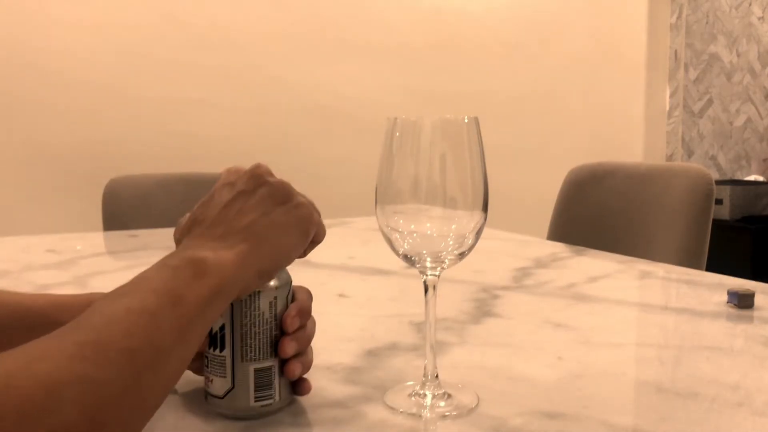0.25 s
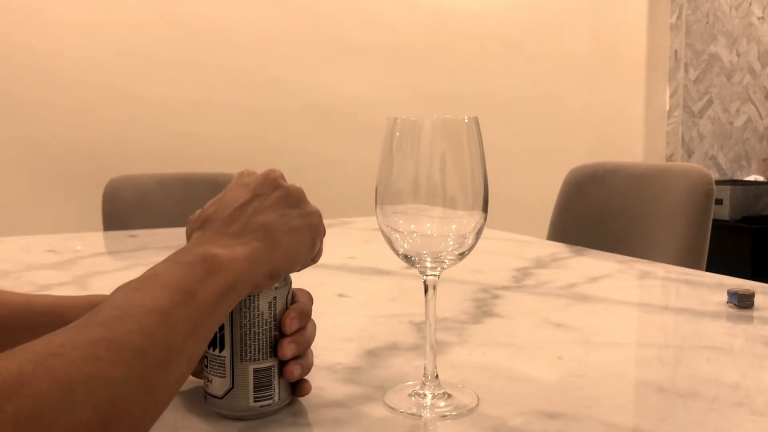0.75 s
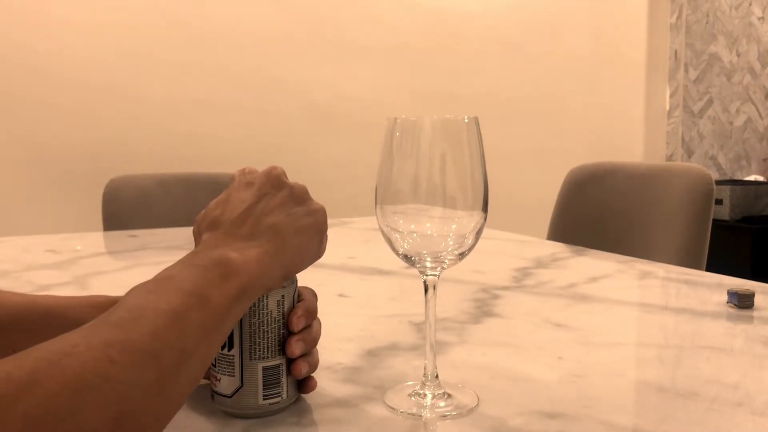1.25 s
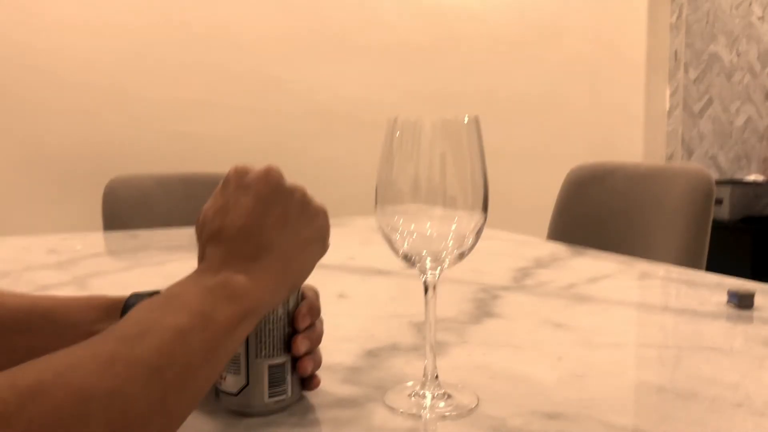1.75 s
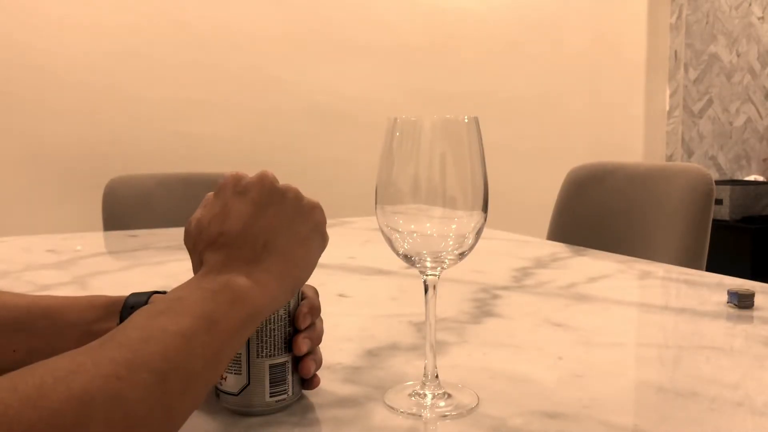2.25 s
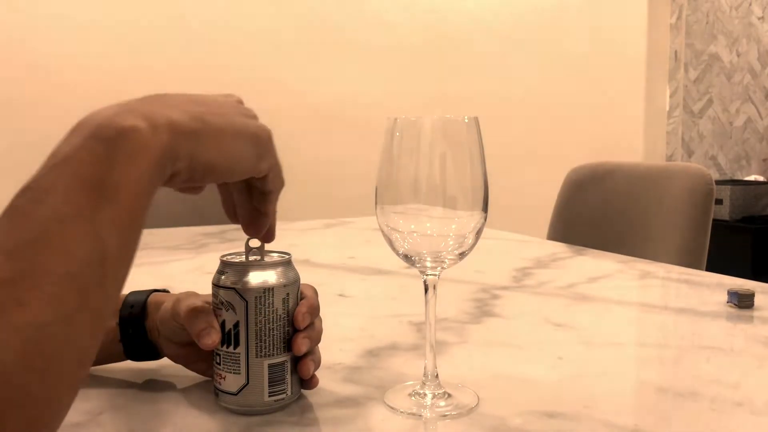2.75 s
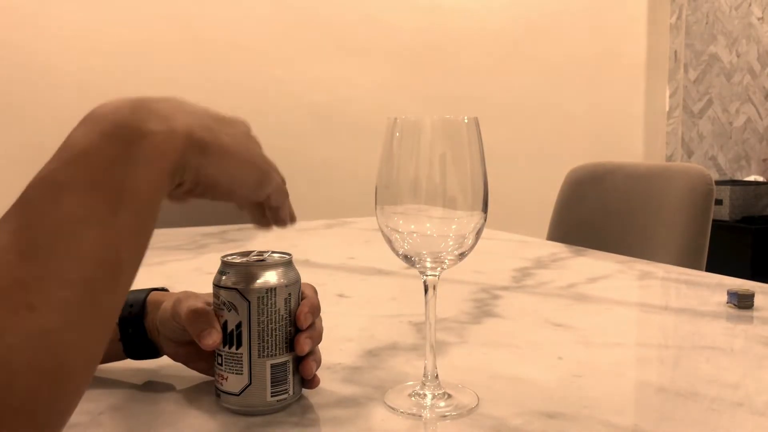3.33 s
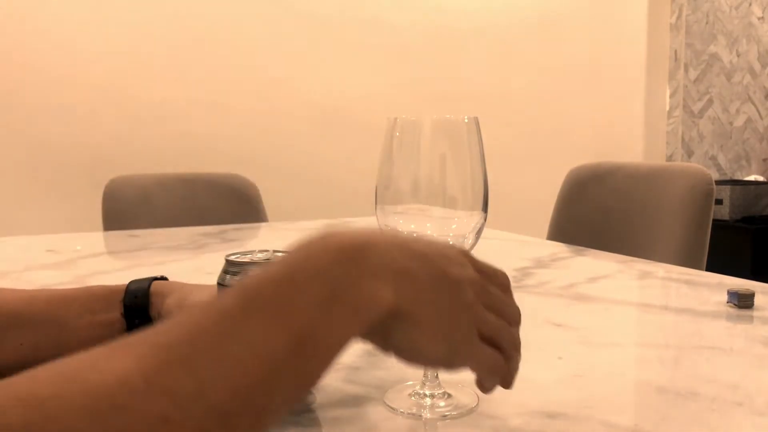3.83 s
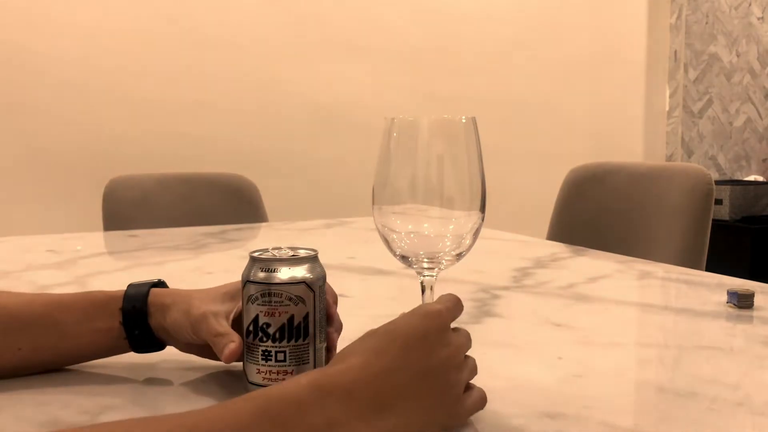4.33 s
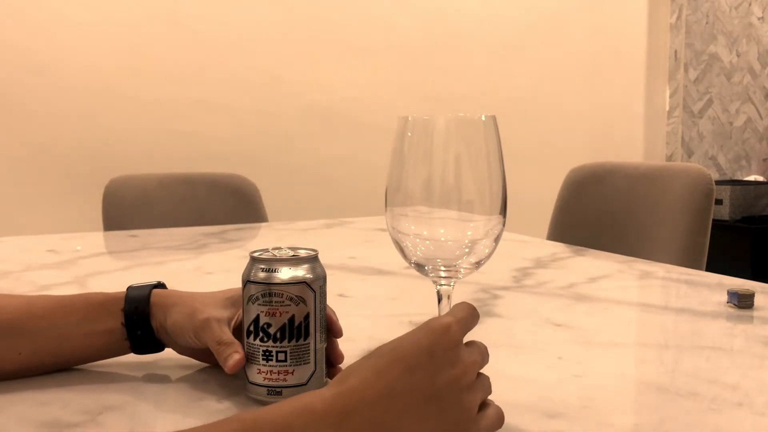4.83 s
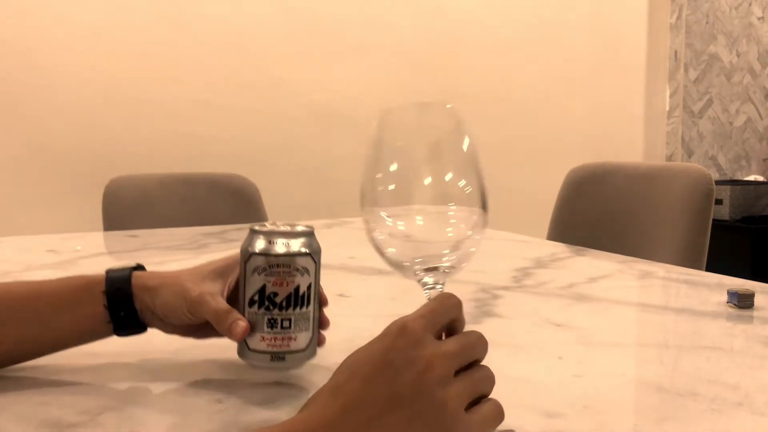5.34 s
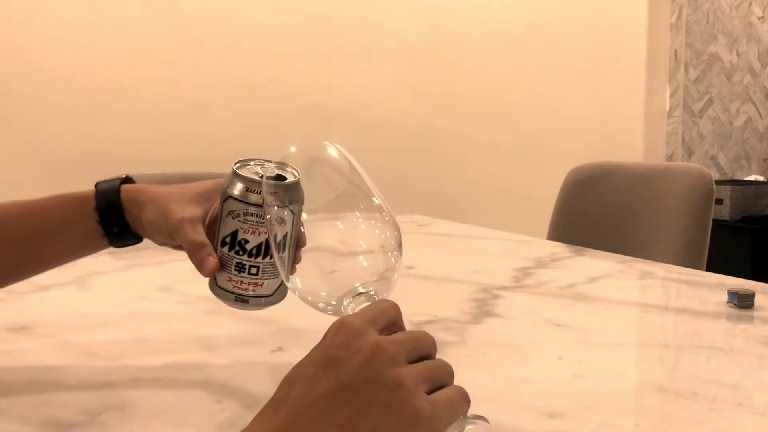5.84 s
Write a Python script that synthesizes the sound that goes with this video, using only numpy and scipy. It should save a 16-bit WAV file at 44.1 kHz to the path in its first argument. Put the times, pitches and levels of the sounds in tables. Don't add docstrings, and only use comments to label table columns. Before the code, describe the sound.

A quiet ventilation hum with a faint low motor tone runs throughout a bare, echoing room. At 0.7 s a ring-pull snaps sharply, and a smooth bright gas hiss swells and fades within about 0.2 s. A louder, thin metallic snap comes at 0.9 s and another at 1.2 s with a weaker spurt and tiny crackles until 1.4 s. At 1.5 s the lid creaks rapidly and tears with a strong crack, followed by hollow little pops and a reverberant tail. Very faint finger ticks and a short drag occur around 2.3-2.4 s. At 3.06 s the tab clicks flat, followed by a dull low can knock. From 4.25 to 4.5 s a glass foot grates over stone in three pushes, with gritty catches and a thin high ring. Near 5.03 s comes a soft lifting scrape, at 5.2 s a small low clink, then barely audible rustles until about 6 s.

```python
import sys
import numpy as np
from scipy import signal
from scipy.fft import rfft, irfft
from scipy.io import wavfile

SR = 44100
rng = np.random.default_rng(int(sys.argv[2]) if len(sys.argv) > 2 else 0)


def transcribe(u):
    v = np.clip(np.atleast_2d(u).T, -1, 1)
    q = np.round(v * 32767).astype(np.int16)
    wavfile.write(sys.argv[1], SR, q)


def field_ratio(decibels):
    return 10 ** (np.asarray(decibels, dtype=float) / 20)


N = 268128

# (pitch [Hz], level per Hz [dB])
HUM_COLOUR = [(18, -50), (30, -28), (65, -9.5), (101, -14), (135, -1.5), (306, -3), (493, -9), (904, -11.5),
              (1150, -13.5), (1500, -17), (1750, -24), (2670, -28.5), (9480, -41), (14800, -45.5),
              (15300, -64)]

# (time [s], peak level [dB], burst length [ms], level sent to the room [dB])
SEAL = [
    (0.6999, -11, 2, -7),
]
SEAL_RING = [(1283, 560, -31.5), (2330, 1400, -18.5), (3840, 570, 6), (5400, 841, -4.5), (6123, 600, -11.5),
             (7600, 750, -21), (8800, 900, -7.5), (10500, 2200, -14), (12910, 1400, -16.5)]
LEVER = [
    (0.9158, -6, 0.92, 0.0054),
]
LEVER_RING = [(1250, 410, -14), (1620, 200, -5.5), (2200, 310, -12), (3400, 200, 2.5), (3870, 180, 4.5),
              (4410, 270, -4.5), (6360, 600, -13.5), (6900, 600, -14), (7600, 550, -17.5),
              (9780, 2500, -26)]
SCORE = [
    (1.1936, -8.5, 3.2, -3.9),
]
SCORE_RING = [(990, 600, -19), (1740, 390, -11), (2680, 720, -19), (3470, 220, 5), (3820, 550, -10),
              (4610, 470, -3), (5650, 700, -8.5), (6670, 702, -10.5), (7630, 700, -13.5),
              (8670, 480, -12.5), (10414, 1800, -14), (14000, 2300, -24)]
# (time [s], peak level [dB])
CRACKLE = [
    (1.1893, -30),
    (1.307, -42),
    (1.3175, -26),
    (1.345, -30),
    (1.3708, -35),
]
CRACKLE_RING = [(2000, 900, -8.5), (3450, 780, -7.5), (5030, 900, -5), (6700, 400, 7), (8370, 490, -2.5),
                (10870, 2000, -12), (14660, 1800, -14)]

# (time [s], swell [s], hold [s], peak level [dB], sag [dB/s])
JET = [
    (.705, .001, 0.021, -39.5, 675),
    (.723, 0.051, .106, -36.5, 54.5),
    (1.215, .001, .12, -49, 163),
    (1.343, 0.00088, 0.099, -56, 210.5),
]
JET_COLOUR = [(410, -49.5), (700, -18.5), (886, -24.5), (1060, -17), (1600, -5.5), (2880, -18.5),
              (3790, -2), (5920, -5.5), (6570, 0.5), (7200, -7), (9110, 2.5), (15200, -4), (16000, -7)]

# (delay [s], level [dB], smear [ms])
WALLS = [
    (.0100, -10.5, 2.3),
    (0.0153, -7.5, 1.2),
]
# (pitch [Hz], time [s])
DECAY = [(150, 0.65), (500, 0.69), (1000, .7), (2500, 0.8), (4500, 0.68), (8000, 0.46), (15000, 0.31)]

# (time [s], peak level [dB])
CREAK = [(1.5058, -30.5), (1.509, -35), (1.514, -30.5), (1.519, -34), (1.5226, -23.5), (1.527, -24.5),
         (1.535, -37), (1.538, -32.5)]
CREAK_RING = [(1200, 1000, -7), (2150, 800, -3.5), (3430, 230, 3), (4900, 630, 3), (6532, 610, 2),
              (7340, 800, -4.5), (9800, 1600, -2.5), (14400, 2500, -12)]
TEAR = [
    (1.542, -6.5, 2, 6.9),
]
TEAR_RING = [(400, 470, -13), (596, 580, -8), (880, 220, -1.5), (1289, 320, -23), (1870, 210, -8.5),
             (2412, 400, -12), (3580, 360, -0.5), (4270, 460, -5.5), (4950, 530, -6.5), (6500, 550, -18),
             (8600, 2400, -15.5), (10800, 3700, -19), (13400, 2500, -21)]
POP = [
    (1.5655, -15.5, 4.7, -3.7),
    (1.571, -23, 6.6, -5),
    (1.584, -24, 3.0, -7),
]
POP_RING = [(100, 45, -12), (243, 167, -17.5), (418, 200, -14), (640, 200, -17), (837.6, 90, 4.5),
            (955, 110, 2), (1865, 120.7, -9)]

SPARK = [(2.3305, -64, 1.0, -6), (2.4298, -51, 1.0, -6), (2.008, -63, 1.0, -6), (3.4545, -59, 1.5, -6)]
SPARK_RING = [(3000, 430, 4), (7500, 1500, 0), (9800, 1300, 11), (12800, 1300, -12), (15000, 1200, -8)]
TICK = [
    (2.2964, -38, 1, -6),
]
TICK_RING = [(970, 230, 2), (3900, 560, 1.5), (5820, 240, -1.5), (6860, 350, -17), (11900, 320, -40)]
# (time [s], swell [s], hold [s], peak level [dB], sag [dB/s])
DRAG = [
    (2.385, 0.022, 0.029, -50.5, -40),
]
DRAG_RING = [(1130, 280, 3.5), (1960, 310, -5.5), (2425, 200, -2), (2980, 240, -6), (3900, 450, -5.5),
             (5000, 1500, -24), (6800, 830, -17.5), (9000, 1500, -21)]

TAB = [
    (3.0635, -24.5, 1.43, -8.5),
]
TAB_RING = [(1140, 123, 12), (2670, 640, -5.5), (4220, 710, -8), (5370, 1400, -11), (7060, 1500, -8.5),
            (9900, 1500, -21), (12340, 1000, -10.5)]
KNOCK = [
    (3.1038, -28, 0.5, -6.5),
]
KNOCK_RING = [(152, 21, -6), (212.5, 11.5, 5), (278, 46, -1.5), (383, 40, 4.5), (800, 260, -4),
              (1147, 98, -3), (2650, 700, -27.5)]

# (time [s], hold [s], airy level [dB], sag [dB/s], duller part above airy [dB])
RUSTLE = [(3.37, 0.088, -74, 148, -9), (5.021, 0.016, -69, 600, -3), (5.044, 0.35, -77.5, -5, -7),
          (5.4, .014, -61.5, 700, -5), (5.425, .18, -72.5, 147, 4.5), (5.82, 0.097, -78, 201, -0.5),
          (5.929, 0.1, -82.5, 160.5, 3.5)]
AIR_COLOUR = [(3000, -36), (6000, -3), (9000, 1.5), (14000, -9), (16000, 1.5)]
RUSTLE_COLOUR = [(880, -9), (1500, -20), (2540, -31), (2770, 3), (3030, -6), (4690, 2), (6890, -14.5),
                 (14900, -43), (16000, -33)]

# (time [s], swell [s], hold [s], peak level [dB], sag [dB/s])
SLIDE = [
    (4.256, 0.0037, 0.097, -38.5, 22),
    (4.374, 0.0085, 0.039, -25, 300),
    (4.428, 0.0052, 0.064, -31, -87),
]
SLAB_RING = [(146, 49, -10.5), (205.3, 15, -3), (294, 85, -11), (417, 75, -5.5), (542, 140, -14),
             (637, 66, 2), (662, 44.5, 8.5), (727, 40, 3.5), (827, 69, 1), (870, 150, -10.5),
             (1080, 184, -16.5)]
GRIT_RING = [(1330, 140, 1.5), (1990, 170, 1), (2600, 420, 2), (3530, 1030, -8.5), (4500, 2100, -15),
             (6400, 1400, -8), (9600, 1400, -14), (13500, 2000, -18)]
JOLT = [
    (4.26, -41, 1.7, -10),
    (4.382, -31.5, 4.6, -15),
    (4.434, -42, 1.5, 4),
]
# (time [s], middle notes level [dB], high notes level [dB])
CATCH = [(4.2885, -62, -67), (4.3080, -72, -67), (4.3238, -61, -66), (4.3758, -63, -59), (4.3829, -41, -44),
         (4.4362, -46.5, -53), (4.4407, -44.5, -57), (4.467, -48, -57), (4.4766, -56, -57),
         (4.4885, -55, -54)]
# (pitch [Hz], level [dB], time to die by 60 dB [s])
GLASS = [(2140, -26, 0.01), (2594, 0, 0.018), (3260, -14, 0.007), (4150, -3, 0.0063), (5350, -14, 0.076),
         (5960, -3.5, 0.0065), (7180, 2.5, 0.0064), (7900, -7.5, .006), (9200, -10, 0.018),
         (10230, -10, 0.024), (11700, -12, 0.0048), (12400, -10, 0.014), (14100, -3, .012),
         (14760, -8, 0.017)]

# (time [s], swell [s], hold [s], peak level [dB], sag [dB/s])
LIFT = [
    (5.03, .001, 0.017, -56.5, 304),
    (5.035, .008, 0.069, -63, 100),
]
LIFT_RING = [(724, 170, -1), (887, 89, 5.5), (2010, 480, -14.5), (4700, 56, -23), (5330, 41, -28),
             (6130, 250, -24), (8950, 74, -21), (9780, 37, -31)]
CLINK = [
    (5.19, -35, 2.3, -4.5),
]
CLINK_RING = [(300, 160, 2), (658, 45, 15), (840, 77, 6), (2270, 450, -8.5), (4770, 72, -2.5),
              (5760, 460, -5), (8600, 550, -11.5), (10300, 740, -34)]


def rms_one(x):
    return x / np.sqrt(np.mean(x ** 2) + 1e-30)


def at_hz(points, hz):
    table_hz, values = np.transpose(points)
    return np.interp(np.log(np.maximum(hz, 1)), np.log(table_hz), values)


def coloured(colour):
    hz = np.arange(N // 2 + 1) * SR / N
    spectrum = rfft(rng.standard_normal(N)) * field_ratio(at_hz(colour, hz))
    return rms_one(irfft(spectrum, N))


def envelope(strokes, release_db_per_s):
    t, out = np.arange(N) / SR, np.zeros(N)
    for start, swell, hold, peak_db, sag in strokes:
        held = t - start - swell
        fall_db = sag * np.clip(held, 0, hold) + release_db_per_s * np.clip(held - hold, 0, 1)
        rise = np.sqrt(np.clip((t - start) / max(swell, 1 / SR), 0, 1))
        out += rise * field_ratio(peak_db - fall_db) * (held < hold + 1)
    return out


def resonate(x, hz, width_hz):
    r = np.exp(-np.pi * min(width_hz, 5000) / SR)
    gain = (1 - r * r) / 2
    return signal.lfilter([gain, 0, -gain], [1, -2 * r * np.cos(2 * np.pi * hz / SR), r * r], x)


def resonate_twice(x, hz, first_width_hz, second_width_hz):
    x = x + 1e-18
    return resonate(resonate(x, hz, first_width_hz), hz, second_width_hz)


def body(x, peaks):
    out = 0
    for k, (hz, width_hz, level_db) in enumerate(peaks):
        note = resonate_twice(x, hz, 1.55 * width_hz, 1.55 * width_hz)
        out = out + (-1) ** k * field_ratio(level_db) * note
    return out


def blows(events, peaks, crack_db, rough=0.06):
    out, t = np.zeros((2, N + SR)), np.arange(SR // 4) / SR
    for start, peak_db, burst_ms, room_db in events:
        ragged, hiss = rng.standard_normal((2, len(t))) * np.exp(-1000 * t / burst_ms)
        ring = body((t == 0) + rough * ragged, peaks)
        crack = field_ratio(crack_db) * np.diff(hiss, prepend=0)
        sound = ring / np.abs(ring).max() + crack
        at = round(start * SR)
        out[:, at:at + len(t)] += field_ratio([[peak_db], [peak_db + room_db]]) * sound
    return out[:, :N]


def grains(per_s, spread_db):
    sizes = field_ratio(spread_db * np.minimum(rng.exponential(1, N), 4)) * rng.choice([-1, 1], N)
    return rms_one(sizes * (rng.random(N) < per_s / SR))


def scrape(gain, peaks, per_s, spread_db, shift_db, room_db):
    slips = grains(per_s, spread_db)
    sound = body(slips * gain, peaks) / np.std(body(slips, peaks))
    return sound * field_ratio([[shift_db], [shift_db + room_db]])


def hum():
    motor_hz, width_hz = 141.8, 5.3
    tone = rms_one(resonate_twice(rng.standard_normal(N), motor_hz, width_hz, width_hz))
    return field_ratio(-59) * coloured(HUM_COLOUR) + field_ratio(-69.5) * tone


def ring_pull_snaps():
    snaps = blows(SEAL, SEAL_RING, crack_db=-21)
    snaps += blows(LEVER, LEVER_RING, crack_db=-36)
    snaps += blows(SCORE, SCORE_RING, crack_db=-21.5)
    burst_ms, room_db = 1.5, -4
    crackles = [(start, db, burst_ms, room_db) for start, db in CRACKLE]
    return snaps + blows(crackles, CRACKLE_RING, crack_db=-24)


def gas_jet():
    spit = 0.05 * np.sqrt(signal.lfilter([1], [1, -0.97], grains(per_s=300, spread_db=0) ** 2))
    jet = coloured(JET_COLOUR) * (1 + spit) * envelope(JET, release_db_per_s=349.5)
    return jet * field_ratio([[-2.5], [-6.5]])


def room(x):
    t = np.arange(2 * SR) / SR
    edges = 60 * 2 ** np.arange(0, 8.6, 0.5)
    white, wash = rng.standard_normal((2, len(t))), 0
    for k, (low, high) in enumerate(zip(edges, edges[1:])):
        band_filter = signal.butter(2, [low, min(high, 0.45 * SR)], "band", fs=SR, output="sos")
        band = signal.sosfilt(band_filter, white[k % 2])
        fall_db = 60 * t / at_hz(DECAY, np.sqrt(low * high))
        late = field_ratio(-16.5 - fall_db / 2.4)
        wash = wash + band * (field_ratio(-fall_db) + late)
    response = wash * field_ratio(-36.5) * np.clip((t - 0.0069) / 0.0037, 0, 1)
    for lag, echo_db, smear_ms in WALLS:
        fade = (t >= lag) * np.exp(-1000 * np.abs(t - lag) / smear_ms)
        scatter = rng.standard_normal(len(t))
        response += field_ratio(echo_db) * scatter * fade / np.sqrt(np.sum(fade ** 2))
    return signal.fftconvolve(x, response)[:N]


def lid_tearing():
    burst_ms, room_db = 2, -1.5
    creaks = [(start, db, burst_ms, room_db) for start, db in CREAK]
    sound = blows(creaks, CREAK_RING, crack_db=-12.5)
    sound += blows(TEAR, TEAR_RING, crack_db=-25)
    return sound + blows(POP, POP_RING, crack_db=-42)


def finger_touches():
    touches = blows(SPARK, SPARK_RING, crack_db=-6) + blows(TICK, TICK_RING, crack_db=-29)
    stroke = envelope(DRAG, release_db_per_s=800)
    return touches + scrape(stroke, DRAG_RING, per_s=2500, spread_db=3, shift_db=-4, room_db=-4.5)


def tab_pressed_back():
    return blows(TAB, TAB_RING, crack_db=-20, rough=0.16) + blows(KNOCK, KNOCK_RING, crack_db=-50)


def rustle():
    swell = 0.0091
    airy_strokes = [(start, swell, hold, db, sag) for start, hold, db, sag, _ in RUSTLE]
    dull_strokes = [(start, swell, hold, db + dull_db, sag) for start, hold, db, sag, dull_db in RUSTLE]
    airy = coloured(AIR_COLOUR) * envelope(airy_strokes, release_db_per_s=904)
    duller = coloured(RUSTLE_COLOUR) * envelope(dull_strokes, release_db_per_s=900)
    return (airy + duller) * field_ratio([[0], [-4]])


def glass_sliding():
    pressure = envelope(SLIDE, release_db_per_s=498)
    slab = scrape(pressure, SLAB_RING, per_s=4000, spread_db=3.5, shift_db=-11.5, room_db=-3)
    slab += blows(JOLT, np.array(SLAB_RING) * [1, 3, 1], crack_db=-40)
    grit = scrape(pressure ** 1.684, GRIT_RING, per_s=2200, spread_db=3, shift_db=-8, room_db=-2.5)
    freed = np.clip((np.arange(N) / SR - 4.46) / 0.04, 0, 1)
    bowl = field_ratio(29) * resonate_twice(grit[0] * freed, 4893, 6, 60)
    return slab + grit + bowl * field_ratio([[0], [-9]])


def glass_catches():
    start, middle_db, high_db = np.transpose(CATCH)
    out = 0
    for hz, level_db, t60 in GLASS:
        width_hz = 3 * np.log(10) / np.pi / t60
        strength_db = high_db if hz > 6500 else middle_db
        varied_db = 3 * rng.normal(0, 1, len(start))
        clicks = np.zeros(N)
        clicks[(start * SR).astype(int)] = field_ratio(strength_db + level_db + varied_db)
        clicks *= SR / np.pi / width_hz
        out = out + resonate_twice(clicks, hz, width_hz, 8 * width_hz)
    return out * field_ratio([[0], [-9]])


def lifting():
    stroke = envelope(LIFT, release_db_per_s=800)
    scraping = scrape(stroke, LIFT_RING, per_s=3000, spread_db=0, shift_db=3, room_db=4.5)
    return scraping + blows(CLINK, CLINK_RING, crack_db=-24)


def scene():
    can = ring_pull_snaps() + gas_jet() + lid_tearing() + finger_touches() + tab_pressed_back()
    direct, sent = can + rustle() + glass_sliding() + glass_catches() + lifting()
    return np.tile(direct + room(sent) + hum(), (2, 1))


def band_limit(x):
    return signal.sosfilt(signal.butter(12, 16900, fs=SR, output="sos"), x)


def record(dry):
    top_cut = signal.cheby2(10, 50, 16750, fs=SR, output="sos")
    return band_limit(signal.sosfilt(top_cut, dry))


dry = scene()
out = record(dry)
transcribe(out)
```